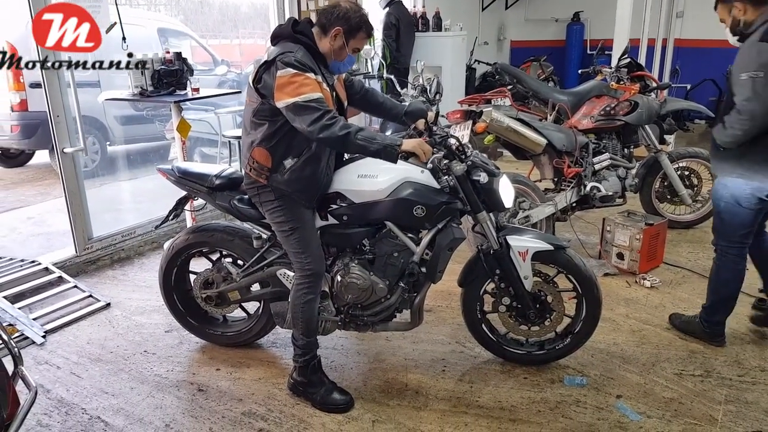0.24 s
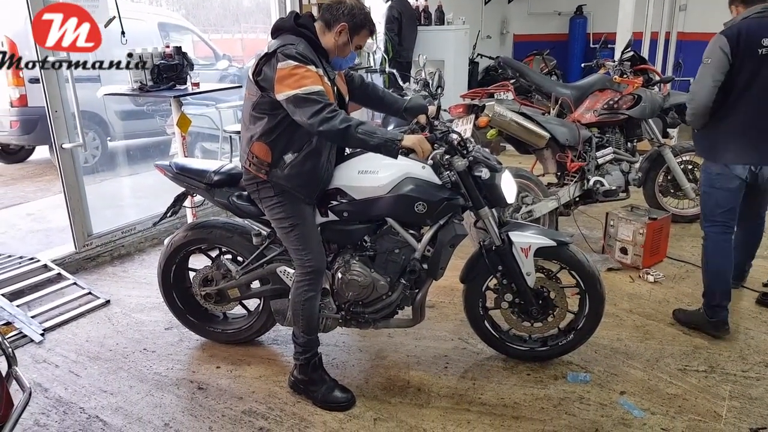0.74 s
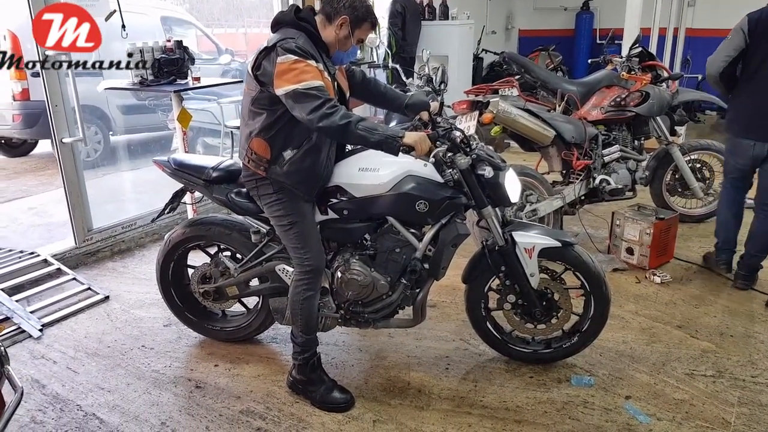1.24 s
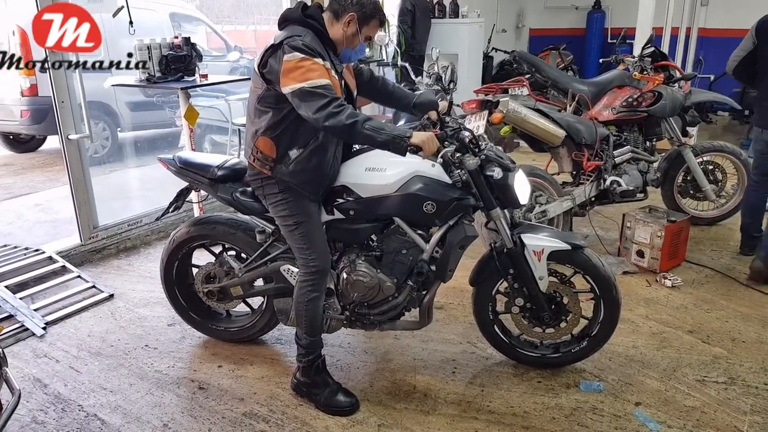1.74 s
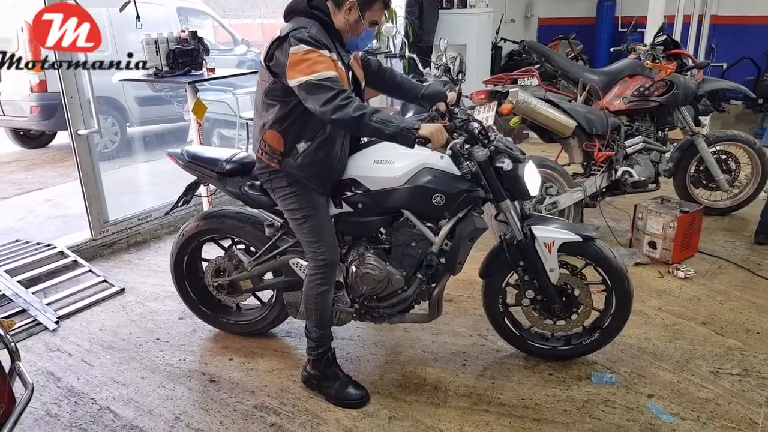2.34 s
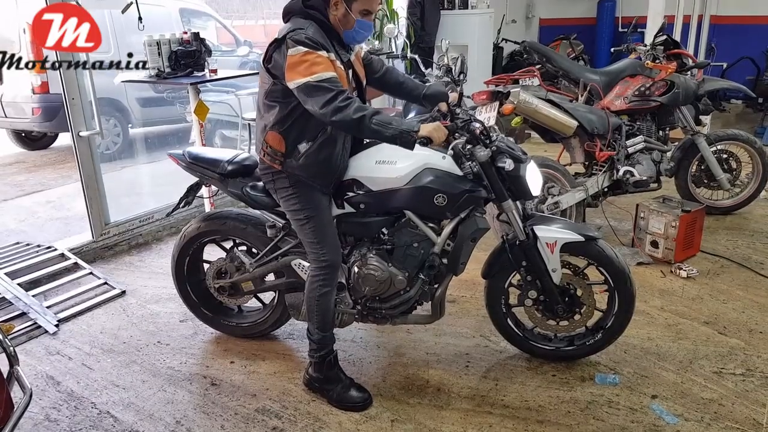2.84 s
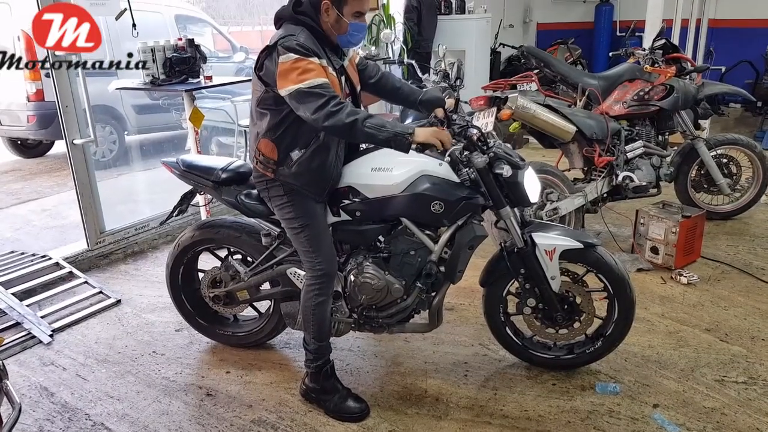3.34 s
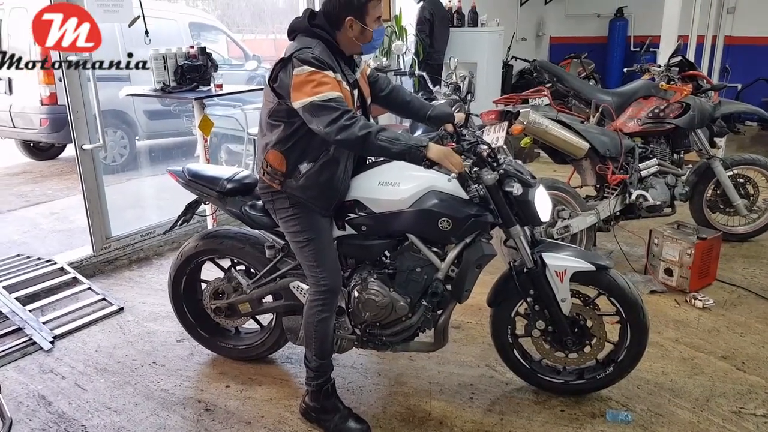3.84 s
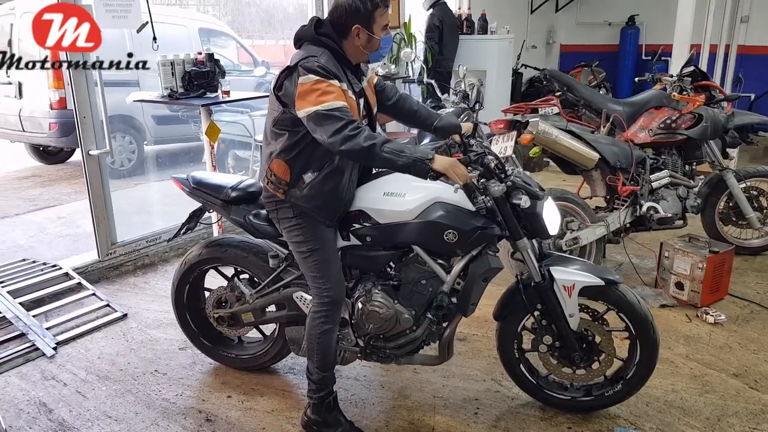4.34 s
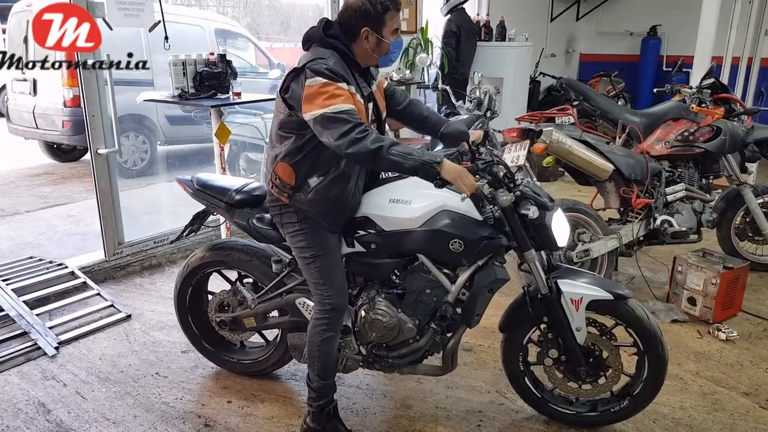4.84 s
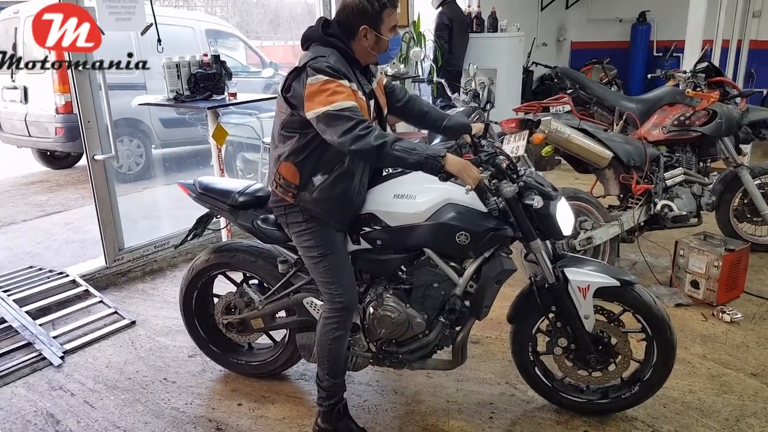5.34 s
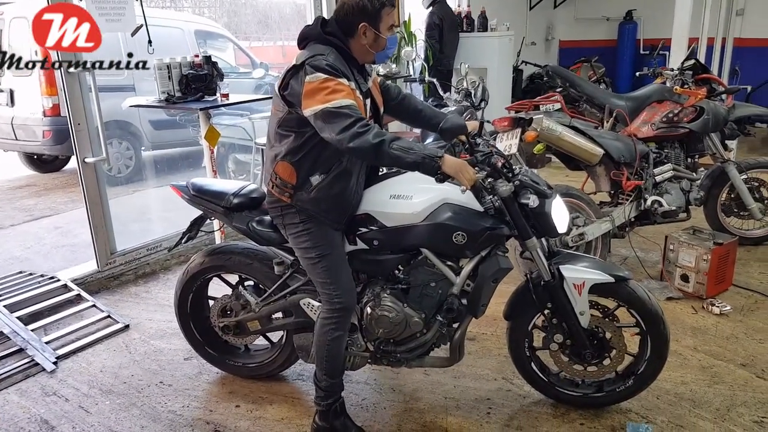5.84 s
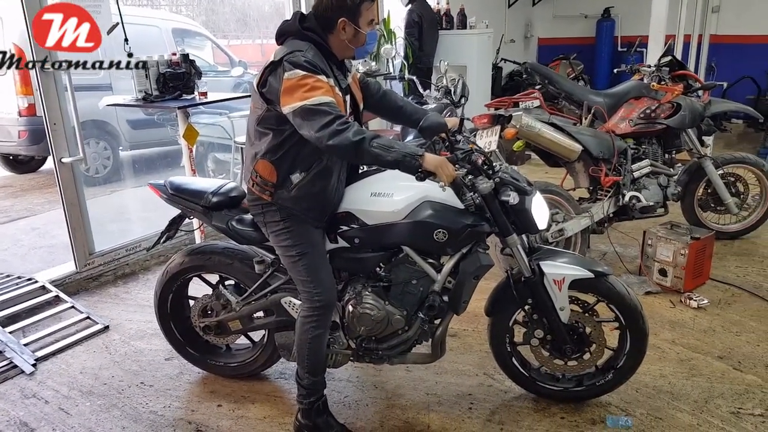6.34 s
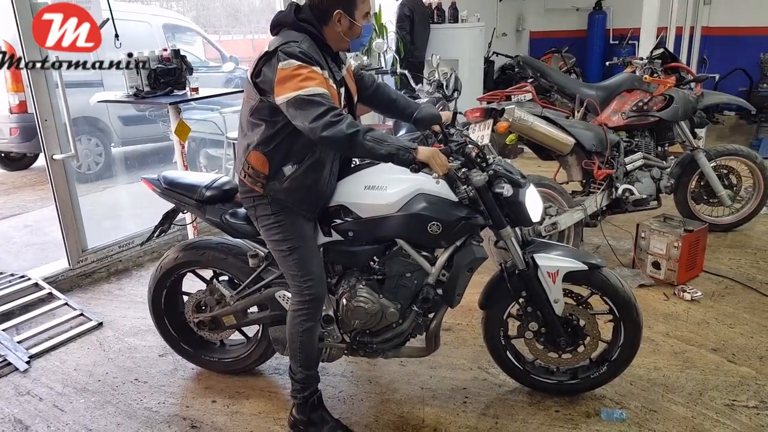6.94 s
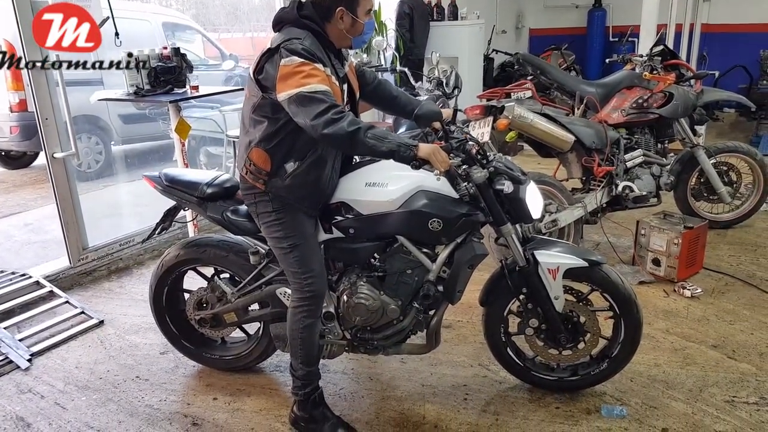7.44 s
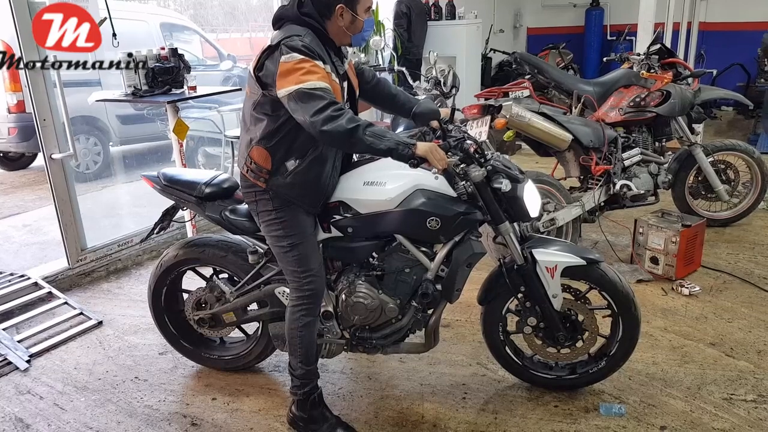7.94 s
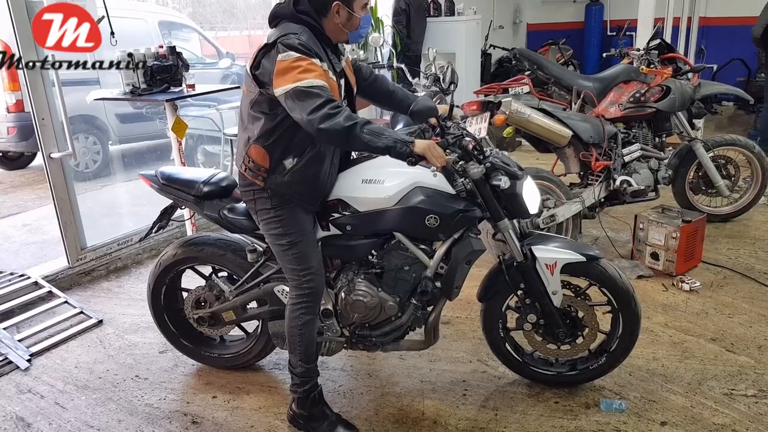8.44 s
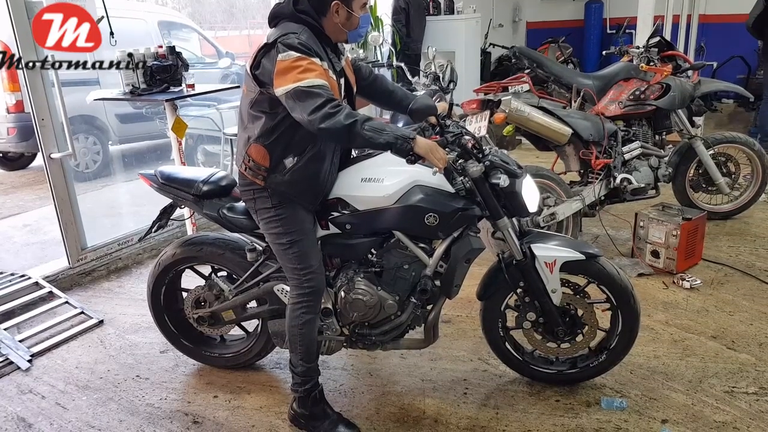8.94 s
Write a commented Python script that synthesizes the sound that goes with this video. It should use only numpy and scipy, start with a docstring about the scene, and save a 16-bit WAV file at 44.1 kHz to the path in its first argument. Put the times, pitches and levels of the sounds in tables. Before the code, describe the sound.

In a workshop with a short echo, a motorcycle runs a few metres from the microphone. It opens on a brief blip and sinks to a thumping, slightly wavering idle. Another quick, crackling blip follows, then more idling. Finally one long rev climbs to a loud rasp and begins falling as the throttle shuts with a hiss, over a faint room rumble.

```python
"""A hard-walled workshop, with a twin-cylinder motorcycle idling a few metres away, in stereo.
It settles from one blip, idles, takes a second short blip, idles again, then revs high and falls back.
Uneven firing pulses ring the exhaust into a deep note with a rasp above it, over a faint room rumble.
Gas hiss and valve clatter ride on top. The second blip's first firings crack sharply, and short bursts
of air come as the throttle opens and shuts."""
import sys
import numpy as np
from scipy import signal
from scipy.fft import rfft, irfft
from scipy.io import wavfile
from scipy.ndimage import uniform_filter1d

SR = 44100
rng = np.random.default_rng(int(sys.argv[2]) if len(sys.argv) > 2 else 0)


def output_pcm(signal):
    """Save a mono or channel-first signal as 16-bit PCM at the path in sys.argv[1].

    Samples are clipped to [-1, 1] before scaling.
    """
    pcm = np.clip(np.atleast_2d(signal).T, -1, 1) * 32767
    wavfile.write(sys.argv[1], SR, np.round(pcm).astype(np.int16))


N = 404838

# The idle hunts slowly; a cycle is two crank turns, each cylinder firing once: time_s, cycle_hz
IDLE_CURVE = [(0.0, 11.31), (0.6, 11.31), (0.875, 11.45), (1.15, 11.47), (1.425, 11.13), (1.7, 10.3),
              (1.975, 10.76), (2.25, 11.34), (2.525, 11.01), (2.8, 10.49), (3.3, 9.26), (3.585, 10.6),
              (3.87, 10.74), (4.155, 11.27), (4.44, 11.21), (4.725, 10.81), (5.01, 10.97), (5.295, 10.32),
              (5.58, 10.65), (5.865, 11.03), (6.15, 11.07), (6.435, 10.79), (6.72, 10.87), (9.18, 11)]
# The long rev: time_s, cycle_hz
REV_CURVE = [(6.72, 11.4), (6.8, 14.9), (6.94, 23.4), (7.01, 28.1), (7.1, 32.7), (7.2, 36.4), (7.3, 39.7),
             (7.5, 45.1), (7.7, 49.7), (7.85, 52.4), (8.0, 54.3), (8.4, 59.2), (8.6, 62.3), (8.77, 63.5),
             (8.82, 62.46), (9.1, 46.4), (9.18, 43.8)]
# The top of each blip: time_s, cycle_hz
BLIPS = [(.04, 24), (2.94, 23)]
# Twists of the throttle: start_s, rise_s, shut_s, load_share, gulp_share
THROTTLE_MOVES = [(-.17, .012, -.15, .6, 1), (2.85, .012, 2.95, 1, 1), (6.735, .07, 8.79, .85, .4)]
# Base levels, sinking at each throttle opening and creeping back: time_s, note_db, hiss_db
BASE_LEVELS = [(0, -31.5, -62.5), (.2, -31.5, -56), (.28, -27.5, -56.5), (.5, -29, -56), (.8, -26.5, -54.5),
               (1.4, -20, -51.5), (1.6, -21.5, -50.5), (2.12, -20, -47.5), (2.2, -17, -46.5),
               (2.6, -14.5, -43), (2.84, -15.5, -41), (3, -25, -50), (3.45, -20.5, -48), (4, -21, -49),
               (4.5, -19, -47.5), (5.2, -17.5, -45.5), (5.7, -14, -42.5), (6.72, -13.5, -41),
               (6.95, -21, -50.5), (7.3, -23, -52.5), (7.8, -24, -50), (8.4, -23.5, -48), (8.75, -23, -49),
               (8.95, -23, -50), (9.18, -22, -48)]
# Exhaust and room resonances with slow gas in the pipe: pitch_hz, width_hz, level_db, polarity
THUMP_MODES = [(54.93, 5.4, -12, -1), (67.1, 16.9, -6, -1), (87.6, 13.6, -1, -1), (99.3, 2.8, -8.5, 1),
               (116.8, 7.5, -7, -1), (135.26, 14.9, -1, 1), (148.4, 10.8, -6.5, 1), (186.8, 5.2, -19, -1),
               (203.7, 8.7, -17, 1), (254, 7.4, -18, 1), (298.4, 14.2, -20, -1), (322.2, 15.6, -22.5, -1),
               (176.5, 45.6, -16.5, 1), (289, 165, -31.5, -1), (398.5, 25, -33, 1)]
# The silencer shuts off the top of the slow pulses: pitch_hz, level_db
THUMP_ROLLOFF = [(20, 0), (420, 0), (500, -16)]
# Exhaust resonances with fast hot gas: pitch_hz, width_hz, level_db
GROWL_MODES = [(54, 2.4, -14), (66, 40, 0.5), (99, 4.9, 4), (110.2, 16.5, 3), (134.3, 18, 11.5),
               (169.7, 22.4, 8.5), (213.7, 19.6, 3.5), (245.7, 17.6, 2), (306.7, 43, 1), (337.4, 26, 2),
               (371.4, 42.6, -1.5), (469.3, 25, -11)]
# Exhaust resonances pulling hard from low speed, thin in the deep bass: pitch_hz, width_hz, level_db
PULL_MODES = [(65.7, 29, -4.5), (91.3, 35, 6.5), (132, 74, -4.5), (162.2, 35, 10.5), (206.4, 21, 8),
              (248.4, 25, 0.5), (285, 150, -12), (390, 45, 1)]
# The deep bass that drops out when coasting: pitch_hz, level_db
DEEP_BASS = [(20, 0), (112, 0), (135, -40)]
# Engine orders the hot pipe favours or damps: cycle_multiple, pulling_gain, coasting_gain
NOTE_ORDERS = [(1, 0.31, 0.41), (2, -0.17, -0.24), (3, -0.0061, 0.15), (5, -0.13, -0.0024),
               (6, -0.18, -0.13), (8, 0.21, -0.31)]
# Silencer resonances that pick out the high engine orders: pitch_hz, width_hz, level_db
SILENCER_MODES = [(510, 130, 3), (606, 30, 6.5), (694, 75, 5.5), (795, 28, 2.5), (857, 54, 5.5),
                  (940, 64, 10.5), (1028, 95, 5.5), (1170, 80, 5), (1257, 73, 6.5), (1393, 82, 5),
                  (1680, 124, -1), (1830, 240, -12), (2334, 28, -1), (2690, 870, -10.5)]
# High orders lifted or dipped in the rasp: cycle_multiple, added_gain
SILENCER_ORDERS = [(11, 0.2), (16, 0.15), (24, -.5), (22, -0.15), (27, 1)]
# Tone of the turbulent rasp: pitch_hz, level_db
RASP_SPECTRUM = [(260, -25), (400, 18), (480, -3), (525, 7), (558, -18), (613, 4), (793, -11), (857, 1),
                 (991, -6), (1270, -1.5), (1520, -18), (1850, -5), (2970, -31), (3500, -16), (4550, -41),
                 (7700, -120)]
# Tone of the gas hiss: pitch_hz, level_db
HISS_SPECTRUM = [(880, -1.5), (1500, -2.5), (1860, -3), (1950, -3), (2380, -2.5), (2980, -8), (3450, -8),
                 (5300, -12), (6140, -13.5), (6840, -20), (8160, -16), (9080, -19), (10600, -16),
                 (13700, -16.5), (15600, -20)]
# Sharp cracks of the second blip's first firings, plus short bursts of air as the throttle opens
# and shuts: start_s, length_s, level_db, centre_hz, width_hz
CRACKS_AND_BURSTS = [(2.846, 0.0053, -32, 8000, 12300), (2.857, 0.013, -30, 5000, 9500),
                     (2.895, 0.0065, -21, 6000, 11000), (2.92, .008, -28, 5000, 9000),
                     (2.942, 0.0081, -23, 2000, 3000), (0.207, 0.03, -46, 3470, 6000),
                     (6.737, 0.0074, -31.5, 4900, 900), (6.764, 0.027, -36, 7000, 13000),
                     (8.818, 0.23, -28.5, 11700, 5150)]
# Engine-case modes rung by the valve gear: pitch_hz, width_hz, level_db
CASE_MODES = [(851, 71, 4.5), (908, 51, 5), (1266, 78, 2), (1850, 140, 2), (2335, 110, -3)]
# How alike left and right sound: pitch_hz, likeness_share
STEREO_LIKENESS = [(60, 1), (150, 0.98), (380, 0.92), (950, 0.48), (2380, 0.071), (5980, 0.05),
                   (15000, 0.01)]
# Left level over right: pitch_hz, level_db
STEREO_TILT = [(60, 0.5), (110, 0.5), (200, 0.5), (380, -1.0), (700, 1.0), (1290, -0.5), (2380, -2.0),
               (4400, -6.0), (8120, -13.5), (15000, -5.0)]

IDLE_HZ = 11  # engine cycles per second
TIME_S = np.arange(N) / SR
BIN_HZ = np.fft.rfftfreq(N, 1 / SR)


def gain_of(db):
    """Decibels to gain."""
    return 10 ** (np.asarray(db) / 20)


def curves(rows):
    """Columns of a timed table as one value per sample."""
    times, *columns = np.transpose(rows)
    return [np.interp(TIME_S, times, column) for column in columns]


def spectrum(points):
    """A tone table as one value per bin, joined up on a log-frequency axis."""
    hz, value = np.transpose(points)
    return np.interp(np.log(BIN_HZ + 1), np.log(hz + 1), value)


def colour(x, points):
    """Equalises x by a tone table."""
    return irfft(rfft(x) * gain_of(spectrum(points)), N)


def steady(x):
    """Rides out the slow level, leaving about rms 1 throughout."""
    power = uniform_filter1d(uniform_filter1d(x ** 2, size=9000), size=9000)
    return x / np.sqrt(abs(power) + 1e-20)


def puffs(clicks, pole):
    """Gives each click a decaying tail, at a steady overall level."""
    return steady(signal.lfilter([1], [1, -pole], clicks))


def band(x, low_hz, high_hz):
    """Steep band-pass."""
    return signal.sosfilt(signal.butter(3, [low_hz, high_hz], "band", fs=SR, output="sos"), x)


def ring(x, modes):
    """Sum of resonances, each applied twice: slow to build, with dark valleys between."""
    f = BIN_HZ[:N // 8]
    response = 0
    for hz, width, db, *polarity in modes:
        peak = 1j * f * width / (hz ** 2 - f ** 2 + 1j * f * width)
        response += np.sign(np.prod(polarity)) * gain_of(db) * peak ** 2
    return irfft(rfft(x)[:len(f)] * response, N)


def wander(x, depth_db):
    """Resonances swell and fade in random patches of time and pitch."""
    frames = signal.stft(x, nperseg=2048)[2]
    patches = rng.standard_normal(frames.T.shape).T
    for _ in range(2):
        patches = uniform_filter1d(patches, 3, axis=0)  # across pitch
        patches = uniform_filter1d(patches, 8, axis=1)  # across time
    frames *= gain_of(depth_db * patches / patches.std())
    return steady(signal.istft(frames, nperseg=2048)[1][:N])


def engine_order(x, speed, multiple):
    """The one partial of x that runs at this multiple of the cycle rate."""
    carrier = np.exp(2j * np.pi * np.round(multiple) * np.cumsum(speed) / SR)
    return 2 * (carrier * uniform_filter1d(x / carrier, size=1500)).real


def spread(x, other):
    """Stereo image: alike in the bass, unrelated in the treble, duller on the left."""
    likeness = np.clip(spectrum(STEREO_LIKENESS), 0, 1)
    tilt = gain_of(spectrum(STEREO_TILT) / 2)
    left = rfft(x)
    right = likeness * left + np.sqrt(1 - likeness ** 2) * rfft(other)
    return irfft([left * tilt, right / tilt], N)


def workshop(x, t60_s=.5, wet_db=-6):
    """Sparse reflections off hard walls: returns x with its tail, and a second tail alone."""
    count, gap, predelay = 1200, 20, 150  # gap and predelay in samples
    at = predelay + np.arange(count) * gap + rng.integers(0, gap, (2, count))
    taps = np.zeros((2, predelay + gap * (count + 1)))
    np.put_along_axis(taps, at, rng.choice([-1., 1.], at.shape) * gain_of(-60 * at / SR / t60_s), 1)
    tails = signal.fftconvolve(x[None], taps / np.linalg.norm(taps[0]), axes=1)[:, :N]
    return steady(x + gain_of(wet_db) * tails[0]), steady(tails[1])


def room_rumble():
    """A faint bed of low noise."""
    return gain_of(-24) * band(rng.standard_normal(N), 10, 217)


def valve_clatter(speed, level_db, taps_per_cycle=14):
    """Valve-gear taps of uneven size, more of them at speed, ring the engine cases."""
    taps = (rng.random(N) < taps_per_cycle * speed / SR) * rng.standard_normal(N)
    return spread(*workshop(ring(taps, CASE_MODES))) * gain_of(level_db)


def cracks_and_bursts():
    """Firing cracks and throttle air bursts: bands of noise that swell and die quickly."""
    out = np.zeros((2, N))
    for start_s, length_s, db, hz, width in CRACKS_AND_BURSTS:
        start = round(start_s * SR)
        t = TIME_S[:min(round(3 * length_s * SR), N - start)]
        noise = rng.standard_normal((2, len(t)))
        burst = band(noise, max(hz - width / 2, 300), min(hz + width / 2, SR / 2.1))
        envelope = np.minimum(t / (.36 * length_s), 1) * gain_of(db - 20 * (t / length_s) ** 2)
        out[:, start:start + len(t)] += envelope * burst / burst.std()
    return spread(*out)


def gas_hiss(clicks, gulp, level_db, bark=.097, throb=.1, tick=.12, ticks_per_s=60):
    """Intake and gas hiss throbs with each firing and barks in a gulp, with small valve ticks."""
    ticks = (rng.random(N) < ticks_per_s / SR) * rng.exponential(1, N)
    envelope = 1 + (throb + bark * gulp) * puffs(clicks, .998) + tick * puffs(ticks, .985)
    air, other_air = colour(envelope * rng.standard_normal((2, N)), HISS_SPECTRUM)
    return spread(steady(air), steady(other_air)) * gain_of(level_db)


def engine_speed(rise_hz_per_s=105, hang_s=.05, fall_hz_per_s=32):
    """Cycles per second: the idle, lifted by the long rev and by blips that climb, hang and fall."""
    (idle,), (rev,) = curves(IDLE_CURVE), curves(REV_CURVE)
    speed = np.maximum(idle, rev * (TIME_S > REV_CURVE[0][0]))
    for peak_s, peak_hz in BLIPS:
        climb = rise_hz_per_s * np.maximum(peak_s - TIME_S, 0)
        fall = fall_hz_per_s * np.maximum(TIME_S - peak_s - hang_s, 0)
        speed = np.maximum(speed, peak_hz - climb - fall)
    return speed


def throttle(unload_s=.3, gulp_rise_s=.0014, gulp_hold_s=.049, gulp_fade_s=.2):
    """Load holds while the throttle is open, then fades; each opening starts with a gulp of air."""
    load = gulp = 0
    for start_s, rise_s, shut_s, load_share, gulp_share in THROTTLE_MOVES:
        age = TIME_S - start_s
        load_fade = np.exp(-np.maximum(TIME_S - shut_s, 0) / unload_s)
        gulp_fade = np.exp(-np.maximum(age - gulp_hold_s, 0) / gulp_fade_s)
        load += load_share * np.clip(age / rise_s, 0, 1) * load_fade
        gulp += gulp_share * np.clip(age / gulp_rise_s, 0, 1) * gulp_fade
    return load, gulp


def levels(speed, load, gulp, note_lag_s=.012):
    """Faders in dB for note, rasp and hiss: each rises with speed, load and gulp."""
    note_base, hiss_base = curves(BASE_LEVELS)
    octaves = np.log2(speed / IDLE_HZ)
    late_gulp = np.interp(TIME_S - note_lag_s, TIME_S, gulp)  # reaches the exhaust after the intake
    note_db = note_base + 10.14 * np.minimum(octaves, .9) + .72 * load + 4.6 * late_gulp
    rasp_db = hiss_base - 5.5 + 7.13 * octaves + (9.2 + 7 * np.clip(octaves, 0, 1)) * load + .43 * gulp
    hiss_db = hiss_base + 9.24 * octaves + .28 * load + 12.5 * gulp
    return note_db, rasp_db, hiss_db


def firings(speed, second_phase=3 / 8, uneven_db=2.2, idle_slip_s=.0005, second_lead_s=.00019):
    """One click per firing, uneven in strength; the timing is shakiest at low speed."""
    cycles = np.cumsum(speed) / SR - .094
    whole = np.arange(int(cycles[-1]))
    at = np.interp(np.sort(np.r_[whole, whole + second_phase]), cycles, np.arange(N))
    strength, lateness = rng.standard_normal((len(at), 2)).T
    slowness = IDLE_HZ / speed[at.astype(int)]
    is_second = np.arange(len(at)) % 2
    # The second cylinder's header pipe is shorter, so its pulse arrives early.
    shift_s = idle_slip_s * lateness * slowness ** 2 - second_lead_s * is_second
    at = np.clip(at + SR * shift_s, 0, N - 1).astype(int)
    second_db = np.interp(slowness, [.5, .9], [-2.2, 3])  # softer at speed, louder at idle
    clicks = np.zeros(N)
    clicks[at] = gain_of(uneven_db * strength * slowness ** .011 + is_second * second_db)
    return clicks


def exhaust_rasp(clicks, puff, speed, load, order_depth, level_db):
    """Turbulent gas rasps at idle; with speed and load, clean orders ringing the silencer take over."""
    lines = ring(clicks, SILENCER_MODES)
    lines += order_depth * sum(gain * engine_order(lines, speed, k) for k, gain in SILENCER_ORDERS)
    rough = steady(colour((6.9 + puff) * rng.standard_normal(N), RASP_SPECTRUM))
    clean = np.clip(.1 + .14 * np.log2(speed / IDLE_HZ) + .6 * load, 0, 1)
    rasp = clean * wander(lines, depth_db=2.4) + (1 - clean) * rough
    return spread(*workshop(rasp, wet_db=-9.5)) * gain_of(level_db)


def exhaust_note(clicks, puff, speed, load, order_depth, level_db, turbulence=.14, coast_loss=.75):
    """Firing pulses ring the pipe: a thump in slow gas, a growl in hot gas, a haul when pulling hard."""
    drive = steady(clicks) + turbulence * puff * rng.standard_normal(N)
    thump, growl, haul = (steady(ring(drive, modes)) for modes in (THUMP_MODES, GROWL_MODES, PULL_MODES))
    hot = np.clip(np.interp(speed, [23.5, 34], [0, 1]) + .57 * load, 0, 1)
    pull = np.clip(load * np.interp(speed, [27.6, 35.7, 45.5, 54.7], [0, 1, 1, 0]), 0, 1)
    note = (1 - hot) * colour(thump, THUMP_ROLLOFF) + hot * growl
    note = steady((1 - pull) * note + pull * haul)
    # Coasting down from high speed rebalances the orders and thins the deep bass.
    slowing = uniform_filter1d(1. * (np.gradient(speed) < 0), size=1500)
    coast = slowing * np.interp(speed, [28, 40], [0, 1])
    note += sum((order_depth * (1 - coast) * pulling + coast * coasting) * engine_order(note, speed, k)
                for k, pulling, coasting in NOTE_ORDERS)
    note = wander(note - coast_loss * coast * colour(note, DEEP_BASS), depth_db=1.2)
    return spread(note, workshop(note)[1]) * gain_of(level_db)


def scene():
    """Engine layers, driven by speed and throttle, over the room rumble."""
    speed = engine_speed()
    load, gulp = throttle()
    note_db, rasp_db, hiss_db = levels(speed, load, gulp)
    clicks = firings(speed)
    puff = puffs(clicks, .996)
    order_depth = np.interp(speed, [58, 53], [0, 1])  # single orders are reshaped near top speed
    note = exhaust_note(clicks, puff, speed, load, order_depth, note_db)
    rasp = exhaust_rasp(clicks, puff, speed, load, order_depth, rasp_db)
    top_end = gas_hiss(clicks, gulp, hiss_db) + cracks_and_bursts()
    return room_rumble() + valve_clatter(speed, hiss_db - 9) + top_end + rasp + note


def record(dry, cutoff_hz=15714):
    """Peaks round off at full scale, then a steep low-pass trims the top."""
    rounded = dry / (1 + abs(dry) ** 4) ** (1 / 4)
    lowpass = signal.firwin(2047, cutoff_hz, window=("kaiser", 12), fs=SR)
    return signal.oaconvolve(rounded, lowpass[None], "same")


dry = scene()
out = record(dry)
output_pcm(out)
```